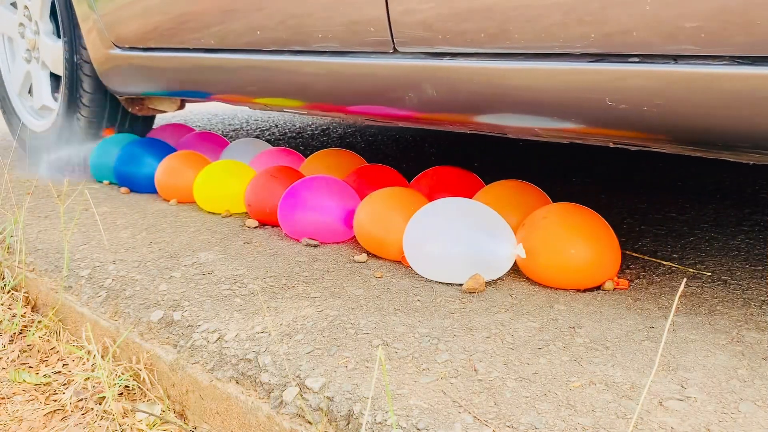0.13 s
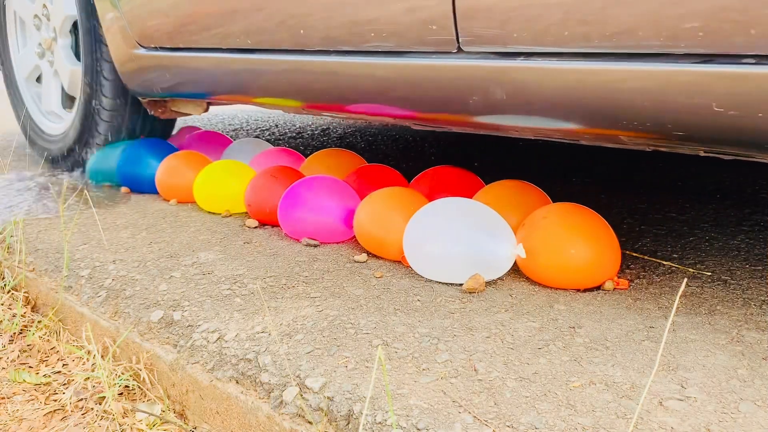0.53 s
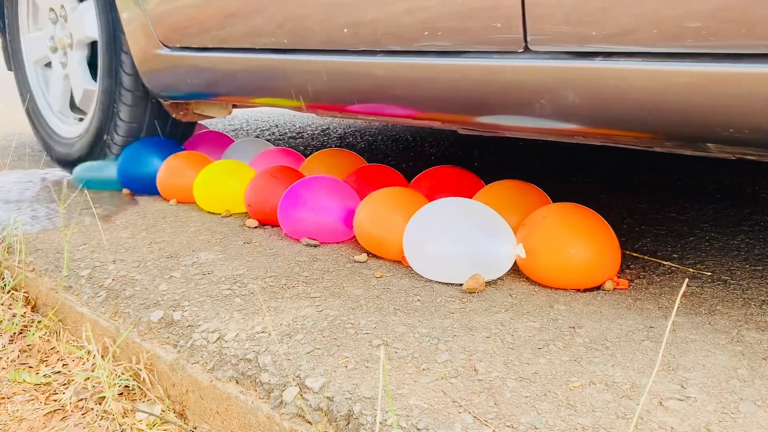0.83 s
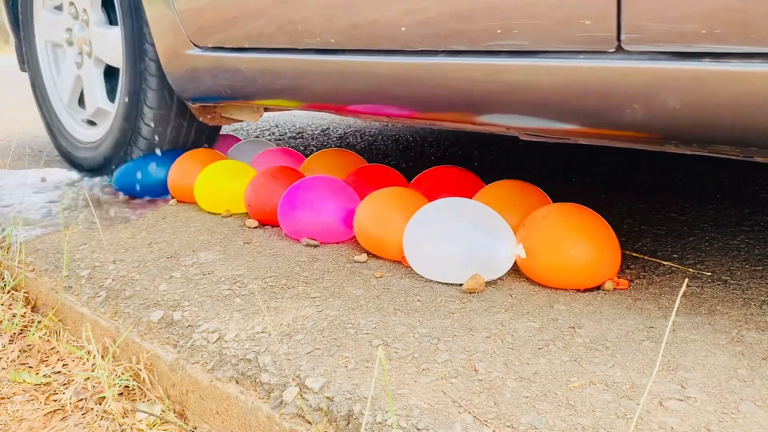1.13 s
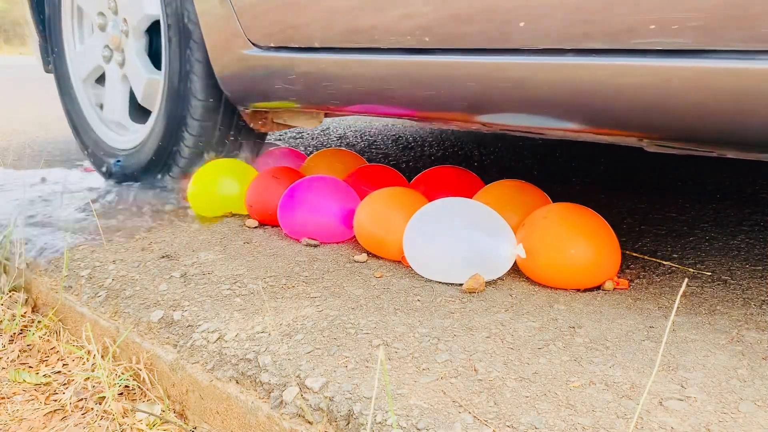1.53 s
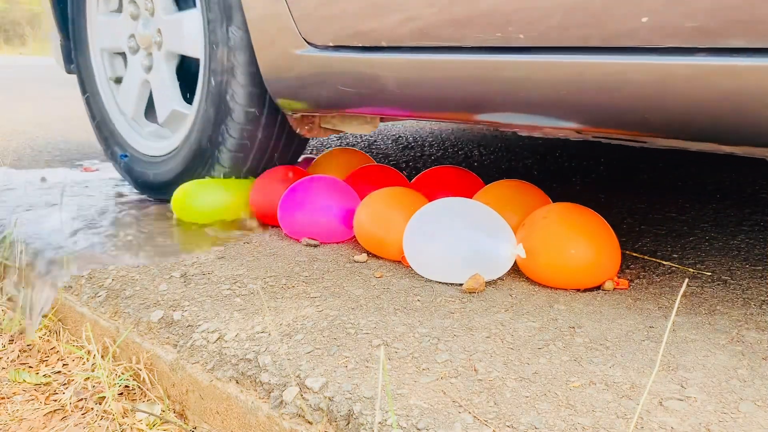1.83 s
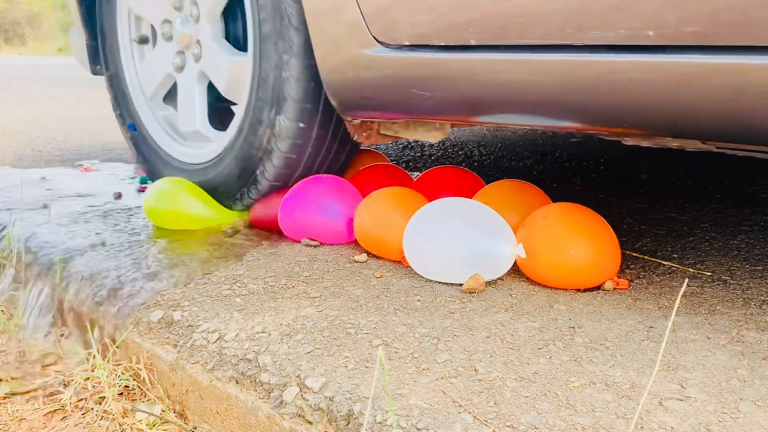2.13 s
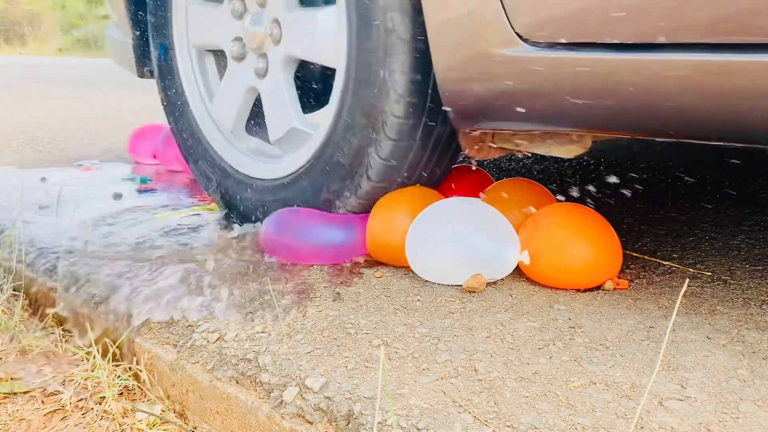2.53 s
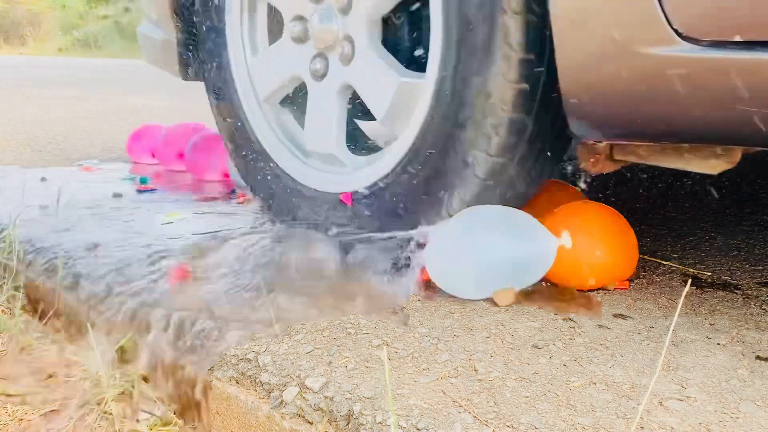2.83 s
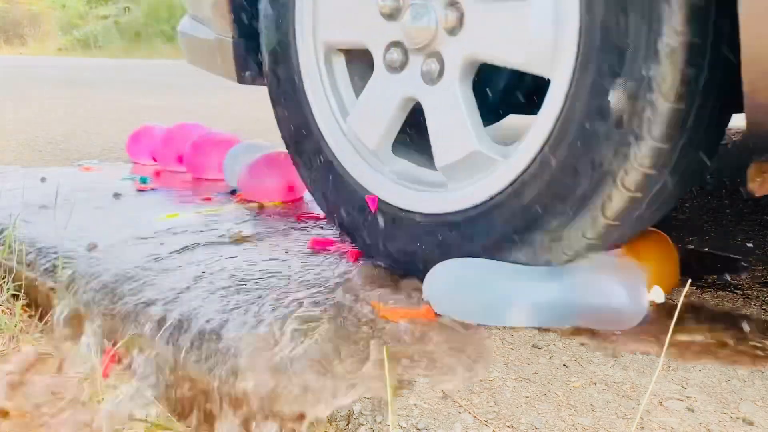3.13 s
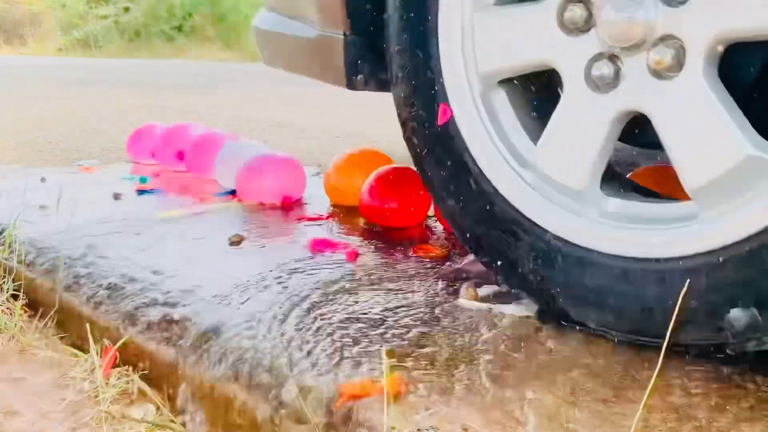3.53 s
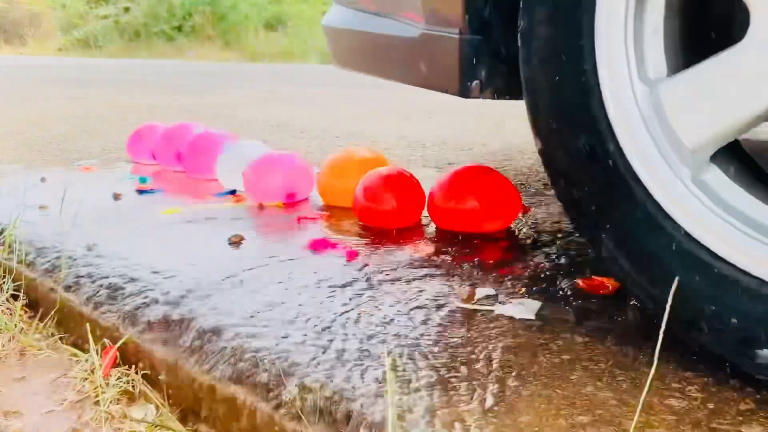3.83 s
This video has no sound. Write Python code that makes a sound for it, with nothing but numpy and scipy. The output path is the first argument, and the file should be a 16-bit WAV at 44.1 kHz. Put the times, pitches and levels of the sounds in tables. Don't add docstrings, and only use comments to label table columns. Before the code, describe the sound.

Water balloons pop under a creeping car tyre, seven sharp cracks with hollow wet slaps, squirts and spray; puddles gurgle and an engine starts rumbling midway. Close stereo microphone outdoors on concrete.

```python
import sys
import numpy as np
from scipy import signal
from scipy.fft import rfft, irfft
from scipy.io import wavfile

SR = 44100
rng = np.random.default_rng(int(sys.argv[2]) if len(sys.argv) > 2 else 0)


def volts_from_decibels(level):
    exponent = np.asarray(level, float) / 20
    return 10 ** exponent


def waveform_to_disk(signal):
    frames = np.transpose(np.atleast_2d(signal))
    scaled = np.clip(frames, -1, 1) * 32767
    samples = np.round(scaled).astype(np.int16)
    wavfile.write(sys.argv[1], SR, samples)


N = 176400
TIME = np.arange(N) / SR
SHORT = np.arange(SR // 5) / SR

# t/s, crack level/dB, crack f/Hz, knock level/dB, knock f/Hz
BURSTS = [
    (0.135, -11, 2760, -29, 1140),
    (0.8643, -11.5, 3310, -19, 830),
    (1.368, -10.5, 3240, -33, 1040),
    (2.3084, -15, 1490, -18, 897),
    (2.6746, -9.5, 6260, -34.5, 1230),
    (2.8208, -17.5, 2130, -19.5, 790),
    (3.2663, -9, 6200, -28, 1480),
]
# t/s, level/dB, f/Hz, length/s
JETS = [(0.187, -25.5, 3350, 0.0022), (0.366, -31, 4600, 0.0042), (0.9636, -32, 6100, 0.0018),
        (0.983, -29, 5560, 0.001), (0.9959, -23, 5600, 0.0022), (1.479, -29.5, 8250, 0.0034),
        (1.5458, -11, 6450, 0.0024), (1.557, -21, 5360, 0.0034), (1.982, -30, 10100, 0.0017),
        (2.34, -12.5, 10400, 0.0062), (2.3, -29, 6060, 0.0037), (2.6705, -21, 6130, 0.0043),
        (3.246, -21, 4430, 0.0029), (3.256, -16, 5230, 0.0047), (0.383, -31.5, 5000, 0.0028),
        (1.395, -26, 7650, 0.0035), (3.463, -28, 8200, 0.0042), (3.564, -23, 8600, 0.0017)]
# t/s, level/dB, f/Hz
GURGLES = [(0.189, -33, 615), (0.536, -39.5, 556), (0.653, -39, 590), (0.982, -29.5, 1140),
           (1.129, -40, 710), (1.199, -30.5, 776), (1.227, -23, 1224), (1.249, -43, 555),
           (1.463, -32.5, 890), (1.546, -28, 990), (1.759, -29, 1710), (1.849, -32, 977),
           (1.974, -30.5, 695), (2.032, -35.5, 875), (2.104, -32.5, 1150), (2.15, -30, 1720),
           (2.436, -32, 1330), (2.55, -31, 984), (2.752, -28.5, 1040), (2.872, -26.5, 941),
           (2.998, -22, 925), (3.057, -32.5, 1060), (3.331, -28, 530), (3.367, -27, 706),
           (3.494, -32.5, 990), (3.559, -32.5, 869), (3.62, -31.5, 736), (3.632, -34.5, 790),
           (3.648, -31, 1460), (0.935, -39, 920), (1.052, -39, 1380), (1.113, -36, 1370), (1.2, -36.5, 588),
           (1.213, -33.5, 815), (1.332, -42, 730), (1.38, -23.5, 970), (1.446, -35, 820),
           (1.535, -31, 1044), (1.598, -34.5, 996), (1.673, -38, 890), (1.7, -37.5, 770),
           (1.875, -38, 1000), (1.81, -52, 1350), (1.94, -44, 1360), (1.951, -33, 1390), (2.168, -37, 1380),
           (2.47, -37, 920), (2.561, -39, 1060), (2.596, -40, 1920), (2.953, -35, 1610), (3.005, -34, 980),
           (3.05, -29.5, 900), (3.067, -21.5, 1670), (3.113, -41, 650), (3.691, -37, 810),
           (3.767, -41, 1520), (3.883, -43, 1600),
           (2.641, -29, 247),
    (2.678, -30.5, 227),
    (2.838, -31, 253),
    (3.37, -28, 331),
    (3.374, -27, 1500),
]
# t/s, level/dB, f/Hz
DROPS = [(0.0687, -44, 4600), (0.271, -35.5, 3320), (0.6622, -31, 6400), (0.919, -30, 7440),
         (1.2042, -33, 2960), (1.792, -29, 8300), (2.1166, -29.5, 3050), (2.491, -19.5, 3320),
         (2.5558, -17.5, 3800), (2.586, -16.5, 8000), (2.7836, -29, 7670), (3.05, -18, 4300),
         (3.0673, -21.5, 3150), (3.5119, -26, 8520), (0.215, -37, 2580), (0.235, -52, 4230),
         (0.43, -35, 2400), (0.47, -49, 3300), (0.3243, -42, 3030), (0.4055, -37, 2870),
         (0.549, -41.5, 3380), (0.586, -36.5, 2780), (0.791, -34, 5520), (1.08, -37, 7900),
         (1.1626, -51, 5030), (1.233, -42, 5500), (1.3338, -43, 7900), (1.687, -31, 3400),
         (1.715, -31, 3730), (1.7613, -47, 2900), (1.8331, -50, 3180), (1.9848, -28, 3250),
         (2.1509, -44, 3760), (2.4435, -37, 2760), (2.5405, -27, 3070), (2.9047, -34, 2900),
         (2.9735, -32, 3940), (3.194, -33.5, 2965), (3.5457, -33, 3300), (3.7152, -36, 3000)]
# t/s, gurgling body level/dB, bright sheet level/dB
FLOW = [(0, -91, -65.5), (.13, -49.5, -66), (.2, -51.5, -51), (.75, -68, -54), (1.202, -48.5, -51.5),
        (1.702, -57, -47), (2.1, -42.5, -46), (2.5, -45, -40), (2.78, -42.5, -46), (2.998, -35.5, -37),
        (3.19, -45.5, -39), (3.25, -46, -41.5), (3.36, -43, -44), (4, -57.5, -44)]
# f/Hz, level/dB
SPRAY_COLOUR = [(300, -5.5), (1500, -15), (4400, -14), (8400, -19.5), (13500, -48), (16000, -50)]
# f/Hz, level/dB
SHEET_COLOUR = [(880, -6.5), (1500, -2.5), (2380, -12.5), (3440, -8.5), (6980, -11), (8120, 7.5),
                (14300, -70)]
# f/Hz, level/dB
BODY_COLOUR = [(260, -18), (480, -14), (902, 4.5), (2370, -25), (2960, 14.5), (5000, -45), (6500, -44),
               (11000, -120)]
# t/s, crank turns f/Hz, level/dB
ENGINE = [
    (2.0, 26.46, -36.5),
    (2.18, 26.45, -38.5),
    (2.312, 26.95, -31.5),
    (2.522, 30.06, -27.5),
    (2.663, 32.72, -30.5),
    (2.72, 33.82, -40),
    (2.9, 36.3, -34),
    (3.45, 34.84, -34.5),
    (4, 35.45, -38),
]
# multiple of the crank speed, level/dB
ENGINE_ORDERS = [(1, -6), (2, 1), (3, -13), (4, -17.5), (5, -19.5), (5.5, -24.5)]
# f/Hz, level/dB, start t/s, end t/s
HUMS = [
    (80, -48, -1, 2.1),
    (160, -55, -1, 2.1),
    (192, -52, 3.35, 3.95),
    (356, -55, 2.8, 3.25),
    (1392, -57, .4, 1.4),
]
# f/Hz, level/dB
AIR_COLOUR = [(15, -37), (25, -12), (45, -5), (83, -5), (250, -14.5), (480, -23.5), (800, -30.5),
              (1230, -25.5), (1380, -25), (2500, -45.5), (3250, -60), (5500, -120)]
# f/Hz, likeness (0 to 1)
LIKENESS = [(60, 0.87), (200, 0), (700, 0), (2000, 0), (6000, 0.16)]


def unit(x):
    return x / np.sqrt(np.mean(x ** 2) + 1e-20)


def at_hz(points, hz):
    table = np.array(points)
    return np.interp(np.log(hz), np.log(table[:, 0]), table[:, 1])


def drift(rate):
    step = 40
    r = np.exp(-2 * np.pi * rate * step / SR)
    slow = signal.lfilter([1], [1, -2 * r, r * r], rng.standard_normal(N // step + 2002))[2000:]
    return np.interp(np.arange(N) / step, np.arange(len(slow)), unit(slow - slow.mean()))


def ring(x, hz, t60):
    r, w = volts_from_decibels(-60 / (t60 * SR)), 2 * np.pi * hz / SR
    return signal.lfilter([0, np.sin(w)], [1, -2 * r * np.cos(w), r * r], x + 1e-18)


def cut(x, hz, kind):
    return signal.sosfilt(signal.butter(2, hz, kind, fs=SR, output="sos"), x)


def swell(t, rise, t60):
    t = np.maximum(t, 0)
    return (1 - np.exp(-t / rise)) * volts_from_decibels(-60 * t / t60)


def add(out, s, x):
    i = int(s * SR)
    out[i:i + len(x)] += x[:N - i]


def hiss(colour, patchy_db):
    out, shared, edges = 0, drift(25), 22 * 2 ** np.arange(0, 9.6, .5)
    white = rng.standard_normal((2, 2, N))
    for k, (low, high) in enumerate(zip(edges, edges[1:])):
        mid, side = cut(white[k % 2], [low, high], "band")
        hz = np.sqrt(low * high)
        alike = np.clip(at_hz(LIKENESS, hz), 0, 1)
        gain = volts_from_decibels(at_hz(colour, hz) + patchy_db * (.5 * shared + drift(14)))
        out = out + gain * (np.sqrt(1 + alike) * mid + np.sqrt(1 - alike) * side * [[1], [-1]])
    return unit(out)


def torn(hz):
    jumps = np.repeat(rng.standard_normal(SR // 100), 20)
    grit = rng.standard_normal(SR // 5) * volts_from_decibels(3.0 * jumps)
    wide = unit(cut(cut(grit, 3550, "high"), 8750, "low"))
    return unit(wide + 0.65 * unit(ring(grit, hz, 4.5 / hz)))


def grains(per_s, low_hz, high_hz, cycles, size_db):
    clicks = volts_from_decibels(size_db * np.minimum(rng.exponential(1, N), 4)) * rng.choice([-1, 1], N)
    clicks = clicks * (rng.random(N) < per_s * volts_from_decibels(3.5 * drift(30)) / SR)
    dealt, out = rng.integers(0, 14, N), np.zeros(N)
    for k, hz in enumerate(np.geomspace(low_hz, high_hz, 14)):
        onset = ring(clicks * (dealt == k), hz, cycles / hz)
        out += hz * ring(onset, hz, 0.91 / hz)
    return unit(out)


def cracks():
    out = np.zeros(N)
    rise_s, tear_t60_s, snap_t60_s, twang_t60_s = .0003, 0.031, .008, .012
    shape = swell(SHORT, rise_s, tear_t60_s) + volts_from_decibels(6) * swell(SHORT, rise_s, snap_t60_s)
    for s, db, hz, _, _ in BURSTS:
        add(out, s, volts_from_decibels(db - 2) * shape * torn(hz))
        twang = swell(SHORT, .0002, twang_t60_s) * np.sin(2 * np.pi * hz * SHORT)
        add(out, s + 0.000928, volts_from_decibels(db - 1.5) * twang)
    return out


def knocks():
    out, lag_s = np.zeros(N), 0.001214
    hollow_t60_s, knock_t60_s, thud_hz, thud_t60_s = 0.018, 0.079, 304, 0.03
    thud = np.sin(2 * np.pi * thud_hz * SHORT / (1 + 42.0 * SHORT)) * swell(SHORT, 0.001, thud_t60_s)
    for s, crack_db, _, db, hz in BURSTS:
        slap = rng.standard_normal(len(SHORT))
        knock = unit(ring(slap, hz, 9 / hz)) + unit(cut(slap, [800, 2200], "band"))
        knock = cut(cut(knock, .8 * hz, "high"), .8 * hz, "high")
        hollow = swell(SHORT, 0.00038, hollow_t60_s) * np.sin(2 * np.pi * hz * SHORT)
        add(out, s + lag_s, volts_from_decibels(db + 13) * hollow)
        add(out, s + lag_s, volts_from_decibels(db + 3.5) * swell(SHORT, 0.000075, knock_t60_s) * knock)
        add(out, s, volts_from_decibels((crack_db + db) / 2 - 5) * thud)
    return out


def jets():
    out, lead_s = np.zeros(N), .03
    t = SHORT - lead_s
    for s, db, hz, length in JETS:
        shape = np.exp(-np.abs(t) / max(length, .0008) * np.where(t < 0, 1.8, 1))
        add(out, s + .8 * length - lead_s, volts_from_decibels(db - 1) * shape * torn(hz))
    return out


def spray():
    rise_s, t60_s, shape = 0.014, 0.19, np.zeros(N)
    for s, crack_db, _, knock_db, _ in BURSTS:
        shape += volts_from_decibels((crack_db + knock_db) / 2) * swell(TIME - s, rise_s, t60_s)
    return volts_from_decibels(-3.5) * shape * hiss(SPRAY_COLOUR, patchy_db=3.5)


def gurgles():
    out, t = np.zeros(N), np.arange(SR // 10) / SR
    spread_s, longest_s, rise_per_s = 0.0059, 0.034, 10.1
    for s, db, hz in GURGLES:
        for k, (late, detune) in enumerate(rng.random((4, 2))):
            pitch = hz * (1 + 0.37 * k * (detune - .3))
            tone = np.sin(2 * np.pi * pitch * (t + rise_per_s * t * t / 2))
            shape = swell(t, 0.0023, min(24 / pitch, longest_s))
            add(out, s + spread_s * k * late, volts_from_decibels(db + 7.5 - 3.07 * k) * shape * tone)
    return out


def drops():
    out, t = np.zeros(N), np.arange(SR // 10) / SR
    for s, db, hz in DROPS:
        tick = unit(ring(rng.standard_normal(len(t)), hz, 17.0 / hz)) + 0.24 * torn(hz)[:len(t)]
        add(out, s, volts_from_decibels(db + 6) * swell(t, 0.00071, 0.0028 + 33.4 / hz) * tick)
    return out


def runoff():
    s, *levels = np.transpose(FLOW)
    body, sheet = (volts_from_decibels(np.interp(TIME, s, db) + 2.2 * drift(14)) for db in levels)
    fizz = volts_from_decibels(-5) * grains(1200, 4500, 11500, cycles=10, size_db=3.5)
    crackle = volts_from_decibels(-4.0) * cut(grains(300, 1500, 5000, cycles=9.0, size_db=4.5), 6000, "low")
    bubbles = grains(200, 704, 1795, cycles=27.0, size_db=4.0)
    bubbles = volts_from_decibels(-8) * cut(bubbles, [600, 2500], "band")
    top = signal.butter(12, 13900, fs=SR, output="sos")
    near = signal.sosfilt(top, sheet * fizz) + body * (bubbles + crackle)
    far = signal.sosfilt(top, sheet * volts_from_decibels(3) * hiss(SHEET_COLOUR, patchy_db=2.5))
    return near, far + body * volts_from_decibels(-4.0) * hiss(BODY_COLOUR, patchy_db=3.5)


def boom():
    hz, t60_s, lag_s = 53.6, 0.7, 0.02
    shake = sum(swell(TIME - s - lag_s, 0.033, t60_s) for s, *_ in BURSTS)
    return volts_from_decibels(-33) * shake * unit(ring(rng.standard_normal(N), hz, 0.84))


def engine():
    s, hz, db = np.transpose(ENGINE)
    speed = np.interp(TIME, s, hz) * (1 + 0.012 * drift(7.1))
    turn = 2 * np.pi * np.cumsum(speed) / SR
    out = np.zeros(N)
    for k, level_db in ENGINE_ORDERS:
        out += volts_from_decibels(level_db + (1.86 + .5 * k) * drift(8.2)) * np.sin(k * turn + rng.uniform(0, 4.3))
    catch = np.clip((TIME - s[0]) / 0.02 + 1, 0, 1)
    return out * np.sqrt(2) * volts_from_decibels(np.interp(TIME, s, db)) * catch


def car_hums():
    drone_hz, drone_from_s = 363, 3.33
    drone = unit(ring(rng.standard_normal(N), drone_hz, 0.069)) * volts_from_decibels(2.6 * drift(7.2))
    out = volts_from_decibels(-51) * np.clip((TIME - drone_from_s) / 0.18, 0, 1) * drone
    for hz, db, start, end in HUMS:
        gate = np.clip(np.minimum(TIME - start, end - TIME) / 0.11, 0, 1)
        out = out + np.sqrt(2) * volts_from_decibels(db + 0.43 * drift(0.87)) * gate * np.sin(2 * np.pi * hz * TIME)
    return out


def open_air():
    return volts_from_decibels(-43) * hiss(AIR_COLOUR, patchy_db=1.0)


def place(x):
    n, dull = np.arange(N), cut(x, 4100, "low")
    lag_s = 0.00027 - 0.000059 * TIME
    out = np.array([x, np.interp(n - SR * lag_s, n, x)])
    echo_db, echo_t60_s = -6.5, 0.065
    for k, lag in enumerate(rng.uniform(0.000884, .02, 14)):
        i = int(lag * SR)
        out[k % 2, i:] += volts_from_decibels(echo_db - 60 * lag / echo_t60_s) * (-1) ** (k // 2) * dull[:N - i]
    return out


def scene():
    trickle, sheet = runoff()
    wheel = place(cracks() + knocks() + jets() + gurgles() + drops() + trickle)
    low = boom() + engine() + car_hums() + open_air()
    bass_pan = volts_from_decibels([[-1], [1]])
    return wheel + spray() + sheet + low * bass_pan


def roll_off(x):
    return signal.sosfilt(signal.butter(12, 16630, fs=SR, output="sos"), x)


def record(dry):
    hz, (left, right) = np.fft.rfftfreq(N, 1 / SR), rfft(dry)
    port_hz, lead_s, in_step_hz, leak = 6000, 17.05 / SR, 8070, .012
    share = (1 - leak) / (1 + (port_hz / np.maximum(hz, 1)) ** 12)
    ahead = left * np.exp(2j * np.pi * (hz - in_step_hz) * lead_s)
    dip = volts_from_decibels(-7 * np.exp(-((hz - 4600) / 800) ** 2))
    both = irfft(np.array([left * dip, share * ahead + np.sqrt(1 - share ** 2) * right]), N)
    both = signal.sosfilt(signal.butter(8, 14100, fs=SR, output="sos"), both)
    return roll_off(both / (1 + np.abs(both) ** 6) ** (1 / 6))


dry = scene()
out = record(dry)
waveform_to_disk(out)
```